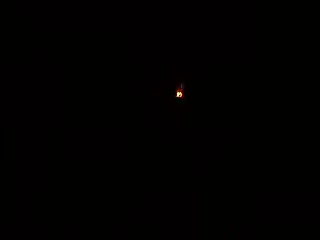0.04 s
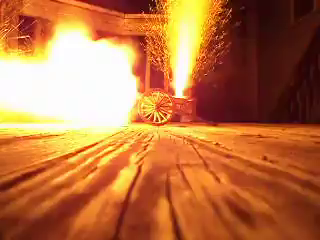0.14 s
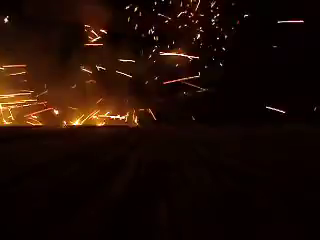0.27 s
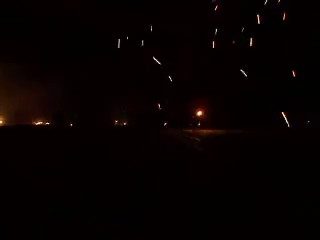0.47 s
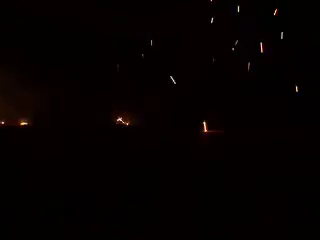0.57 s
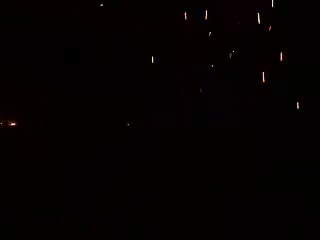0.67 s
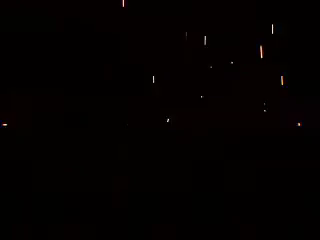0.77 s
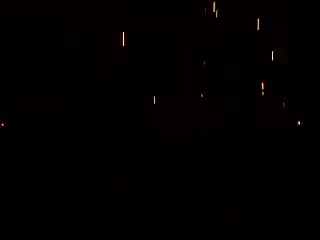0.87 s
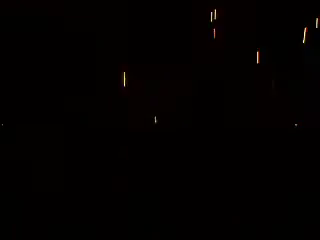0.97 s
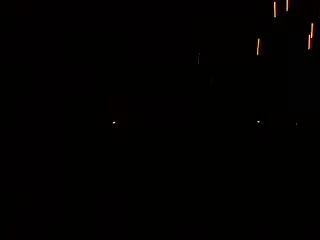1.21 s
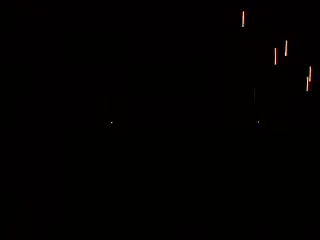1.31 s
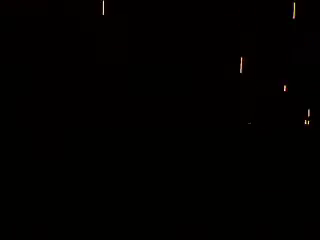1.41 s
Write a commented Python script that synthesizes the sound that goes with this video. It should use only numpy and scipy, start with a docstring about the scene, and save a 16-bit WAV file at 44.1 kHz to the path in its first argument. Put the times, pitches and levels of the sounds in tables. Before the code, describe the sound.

A cannon fires at about 0.25 seconds, after a moment of near silence in an open field. The crack and boom overload the microphone, with sharp slaps from nearby things until 0.5 seconds. Dull echoes return around 0.5 and 0.7 seconds as the roar rolls away and loses its brightness. A faint distant echo arrives near 1.3 seconds within the low, fading rumble.

```python
"""Quiet night air over an open field, then a cannon fires. The shock front and its overpressure pin
the microphone against one end of its travel while the roar of scattered reflections tears it back
and forth. Nearby things return sharp slaps. The roar rolls away over the land, dulled by the air,
and a second after the shot a distant edge of the field throws it back."""
import sys
import numpy as np
from scipy import signal
from scipy.fft import rfft, irfft
from scipy.io import wavfile
from scipy.ndimage import uniform_filter1d

SR = 44100
rng = np.random.default_rng(int(sys.argv[2]) if len(sys.argv) > 2 else 0)


def unload_audio(sound):
    """Save the sound as a 16-bit wav file, at the path given as the first command line argument."""
    columns = np.transpose(np.atleast_2d(sound))
    # keep every value between -1 and 1, then stretch to whole-number steps
    steps = np.round(np.clip(columns, -1, 1) * 32767)
    wavfile.write(sys.argv[1], SR, steps.astype(np.int16))


N = 63945

# shock fronts (time [s], length [s], pressure [dB])
SHOCK_FRONTS = [(.2355, .0013, 14), (.2720, .0085, 6)]
# slaps from things nearby (time [s], level [dB])
NEAR_SLAPS = [(0.287, -5), (0.324, -27), (0.3585, -14), (0.4805, -25)]
# echoes from the surroundings (time [s], level [dB], rise [s], fade [dB/s])
FAR_ECHOES = [(0.513, -15.5, 0.0092, 93), (0.69, -25, 0.0059, 135), (1.255, -32.5, 0.0051, 17),
              (1.357, -32, 0.0039, 86)]
# near blast spectrum (frequency [Hz], density [dB])
BLAST_SPECTRUM = [(40, -6), (100, 2), (260, 5.5), (550, 5.5), (1000, 0.5), (1700, -5.5), (2600, -7),
                  (5200, -25)]
# crack and slap spectrum (frequency [Hz], density [dB])
CRACK_SPECTRUM = [(200, -45.5), (900, 1.5), (1500, 3), (3000, -13.5), (5500, -13)]
# rolling roar spectrum (frequency [Hz], density [dB])
ROLL_SPECTRUM = [(25, -24), (55, -18.5), (110, -4.5), (280, -1), (620, 1), (1000, -3.5), (1700, -11.5),
                 (2600, -23.5), (5200, -38)]
# echo spectrum (frequency [Hz], density [dB])
ECHO_SPECTRUM = [(25, -7.5), (70, -12.5), (200, -1.5), (400, 2.5), (900, -0.5), (1650, -10.5),
                 (2700, -26.5), (5200, -40.5)]
# night air spectrum (frequency [Hz], density [dB])
AIR_SPECTRUM = [(25, 9), (100, -9.5), (250, -5.5), (700, -7.5), (2000, -19), (5200, -20)]

FIRE_S, BAND_HZ = .2353, 5390


def undb(db):
    """Decibels to gain."""
    return 10 ** (np.asarray(db) / 20)


def age(start_s):
    """Seconds since start, zero before it."""
    return np.maximum(np.arange(N) / SR - start_s, 0)


def burst(start_s, db, rise_s, fade_db_per_s):
    """Envelope: linear rise, exponential fade."""
    return np.minimum(age(start_s) / rise_s, 1) * undb(db - fade_db_per_s * age(start_s))


def colour(x, spectrum):
    """Shape x to a spectrum, band-limited, at rms 1."""
    hz, db = np.array(spectrum).T
    bins_hz = np.maximum(np.fft.rfftfreq(N, 1 / SR), 1)
    gain = undb(np.interp(np.log(bins_hz), np.log(hz), db))
    rolloff = np.hypot(1, (bins_hz / BAND_HZ / 1.2) ** 6)
    y = irfft(rfft(x) * gain / rolloff, N)
    return y / y.std()


def butter(x, hz, kind):
    """First-order high-pass or low-pass."""
    return signal.sosfilt(signal.butter(1, hz, kind, fs=SR, output="sos"), x)


def wander(rate_hz):
    """Slow random drift, spread near 1."""
    size = int(SR / rate_hz)
    return uniform_filter1d(rng.standard_normal(N)[np.arange(N) // size], size)


def scatter(spectrum, hits_per_s=6000, spread_db=1.5, flutter_db=1.0):
    """Thousands of small, uneven reflections; their level flutters."""
    hits = rng.random(N) < hits_per_s / SR
    sizes = rng.choice([-1., 1.], N) * undb(spread_db * rng.standard_normal(N))
    return colour(hits * sizes, spectrum) * undb(flutter_db * wander(rate_hz=60))


def shock(push_db=-2.5, rise_s=.014, fall_s=.06):
    """Steep pressure fronts on a slowly falling overpressure."""
    pressure = undb(push_db) * np.minimum(age(FIRE_S) / rise_s, 1) * np.exp(-age(FIRE_S) / fall_s)
    for start_s, length_s, db in SHOCK_FRONTS:
        pressure += undb(db) * (age(start_s) > 0) * np.maximum(1 - (age(start_s) / length_s) ** 2, 0)
    return pressure


def blast_envelope(db, fade_db_per_s, hold_s=0.034):
    """Instant attack, short hold, exponential fade."""
    return (age(FIRE_S) > 0) * undb(db - fade_db_per_s * age(FIRE_S + hold_s))


def roar():
    """Blast off the ground near the gun, its bright crack, then the roll scattered by the land."""
    blast = blast_envelope(db=-6, fade_db_per_s=132) * scatter(BLAST_SPECTRUM)
    crack = blast_envelope(db=-6, fade_db_per_s=242) * scatter(CRACK_SPECTRUM)
    roll = burst(FIRE_S, db=-7.5, rise_s=0.054, fade_db_per_s=33.5) * scatter(ROLL_SPECTRUM)
    return blast + crack + roll


def slaps():
    """Short bright reflections crackling in the roar."""
    envelope = sum(burst(*slap, rise_s=0.00017, fade_db_per_s=2205) for slap in NEAR_SLAPS)
    return envelope * scatter(CRACK_SPECTRUM)


def echoes():
    """Dull, distant returns of the blast."""
    return sum(burst(*echo) * scatter(ECHO_SPECTRUM) for echo in FAR_ECHOES)


def air_absorption(x, corner_hz=1970, fade_db_per_s=17.5):
    """Air takes the treble from later arrivals."""
    low = butter(x, corner_hz, "low")
    return low + (x - low) * undb(-fade_db_per_s * age(FIRE_S))


def night_air(db=-58.5):
    """Faint, steady, bass-heavy noise."""
    return undb(db) * colour(rng.standard_normal(N), AIR_SPECTRUM)


def scene():
    """Shock and its reflections over night air, mono."""
    reflections = air_absorption(roar() + echoes() + slaps())
    return (shock() + reflections + night_air())[None]


def record(dry):
    """Microphone saturates unevenly; gain control ducks; a narrow-band input stage clips the peaks."""
    rail_up, rail_down, knee = .45, .97, 2.6  # travel each way [full scale], hardness of the stops
    duck_depth, duck_s = 1.6, .11
    coupling_hz, top_hz = 23.8, 16000
    latch, ceiling = .665, .68  # [full scale]
    rail = np.where(dry > 0, rail_up, rail_down)
    y = dry / (1 + np.abs(dry / rail) ** knee) ** (1 / knee)
    load = butter(np.abs(y), 1 / (2 * np.pi * duck_s), "low")
    y = butter(y / (1 + duck_depth * load), coupling_hz, "high")
    y = signal.sosfilt(signal.cheby1(10, .3, BAND_HZ, fs=SR, output="sos"), y)
    y = np.where(np.abs(y) > latch, np.sign(y) * ceiling, y)
    return signal.sosfilt(signal.ellip(8, .2, 70, top_hz, fs=SR, output="sos"), y)


dry = scene()
out = record(dry)
unload_audio(out)
```